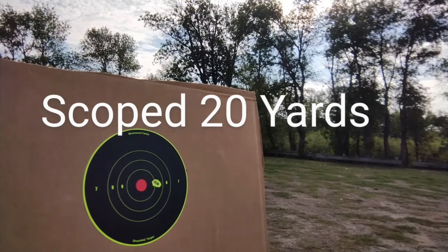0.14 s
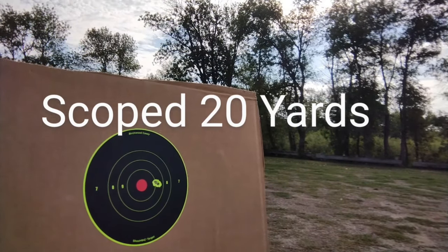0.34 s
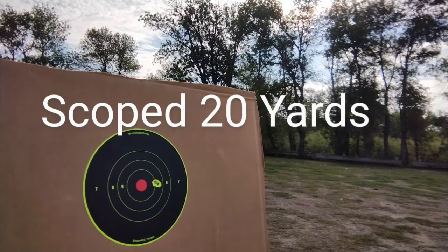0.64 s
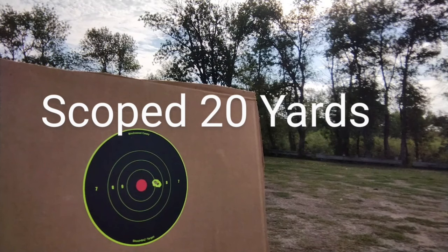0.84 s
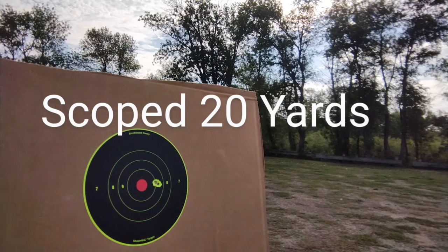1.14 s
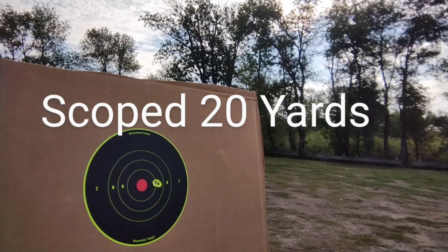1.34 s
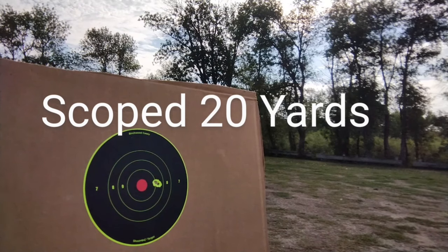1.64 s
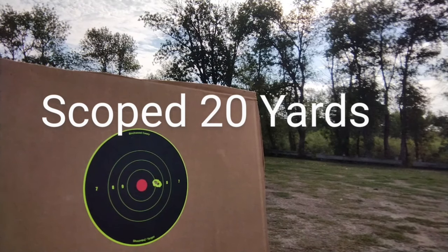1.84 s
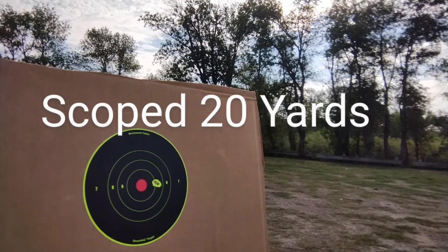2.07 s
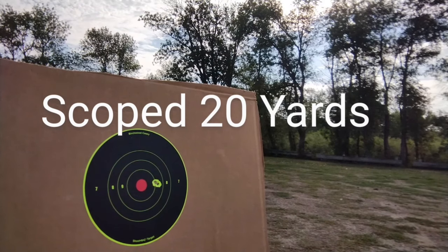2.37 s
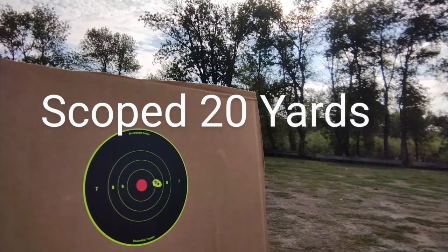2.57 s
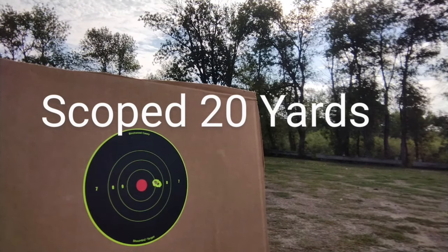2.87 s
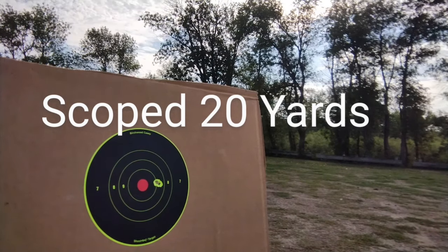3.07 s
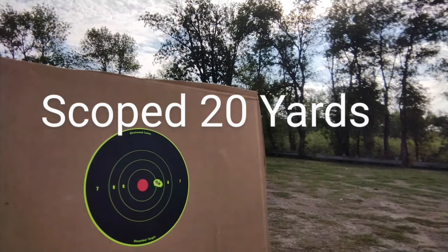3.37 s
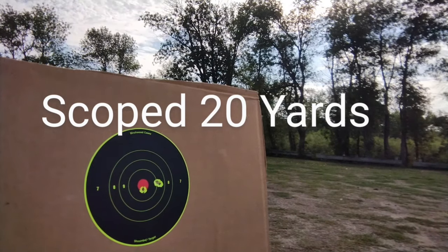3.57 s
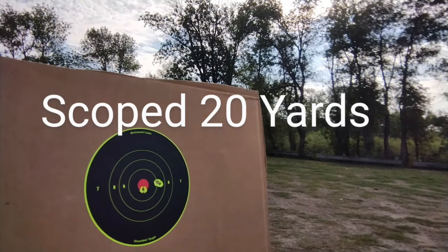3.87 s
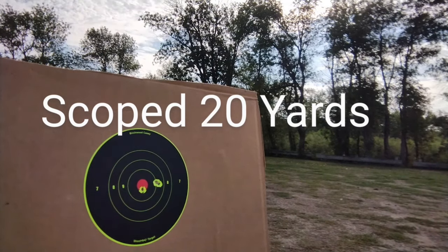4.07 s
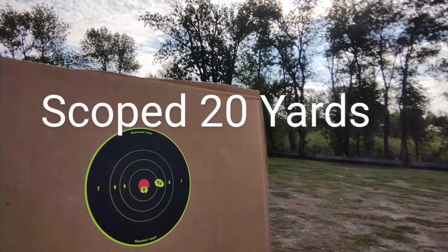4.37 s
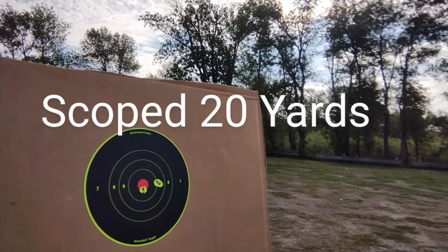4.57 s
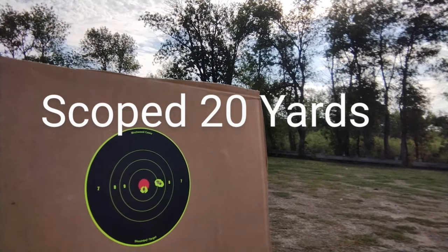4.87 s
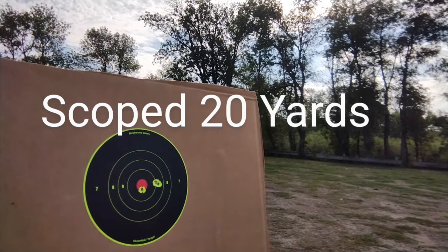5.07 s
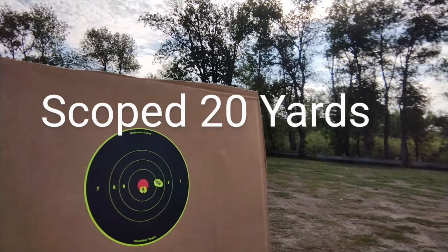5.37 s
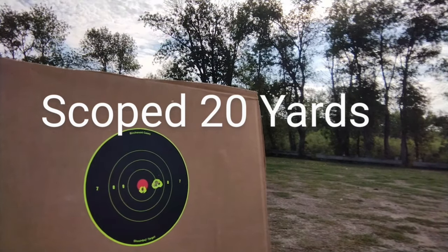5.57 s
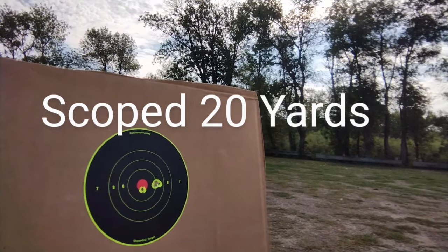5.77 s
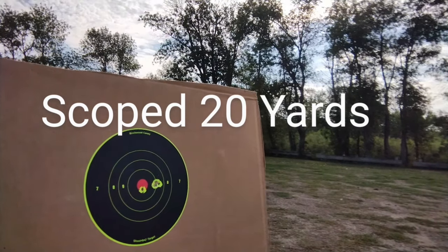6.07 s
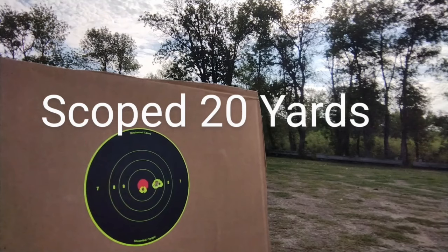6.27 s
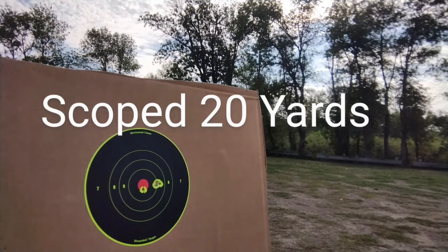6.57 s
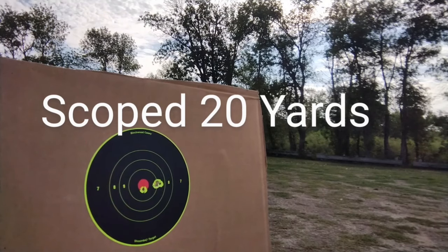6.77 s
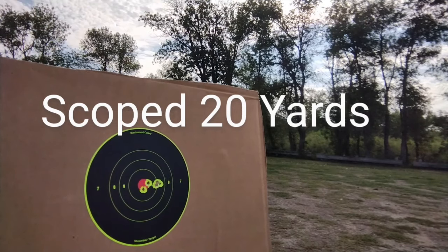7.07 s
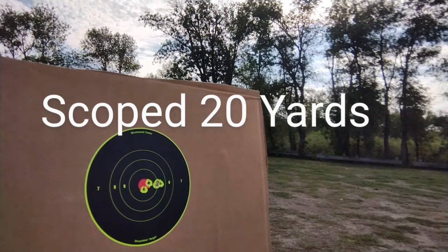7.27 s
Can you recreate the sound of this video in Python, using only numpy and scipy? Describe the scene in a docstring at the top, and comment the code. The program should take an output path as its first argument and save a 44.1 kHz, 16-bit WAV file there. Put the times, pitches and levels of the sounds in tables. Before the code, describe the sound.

A quiet yard with a pulsing cricket, faint insect chorus and distant chirps is broken at once by a hard, dry air rifle crack and card-tearing smack right at the microphone. A brief wash of echo scatters off trees, then calm for three seconds. Three more shots follow about two seconds or less apart, each with snap, hollow board thud and echo; light low wind buffets the microphone, mostly later.

```python
"""Yard, microphone beside a cardboard target: an air rifle fires four pellets, each a rasp and a ringing report,
then a whizz of rising noise and a slap of ripping noise and card modes. A grainy wash and single slaps
come back from trees and hard faces; after the first three shots the spent pellet patters down behind the card.
Throughout, a cricket trills in pulsed tones over an insect chorus of noise, with gliding bird whistles far off,
faint low tones, distant rumble and light wind in lumps of low noise on the microphone."""
import sys
import numpy as np
from scipy.fft import rfft, irfft
from scipy.io import wavfile
from scipy.ndimage import map_coordinates

SR = 44100
rng = np.random.default_rng(int(sys.argv[2]) if len(sys.argv) > 2 else 0)


def unload_audio(sound):
    """Save the sound as a 16-bit wav file, at the path given as the first command line argument."""
    columns = np.transpose(np.atleast_2d(sound))
    # keep every value between -1 and 1, then stretch to whole-number steps
    steps = np.round(np.clip(columns, -1, 1) * 32767)
    wavfile.write(sys.argv[1], SR, steps.astype(np.int16))


N = 327663
T = np.arange(N) / SR

# Spectra of noise all list: f/Hz, relative level/dB per Hz. Modes list: f/Hz, relative level/dB, t60/s.
# Muzzle reports: t/s, report level/dB, whizz level/dB, echo reference level/dB
SHOT_EVENTS = [(0.1724, -1.5, -29.5, -36.5), (3.5031, -6, -28, -35.5), (5.646, -5, -34, -37.5),
               (7.0928, -4, -30, -36.5)]
# Pellet strikes at the card: t/s, tear level/dB, air push level/dB, board level/dB, snap level/dB
STRIKES = [(0.1897, -10.5, -19.5, -25, -8.5), (3.521, -13.5, -27.5, -28.5, -9.5),
           (5.663, -14, -23, -26, -8), (7.1101, -8.5, -20.5, -21.5, -8)]
# Ringing modes of the barrel: f/Hz, relative level/dB, t60/s
BARREL_MODES = [(200, -14, 0.0036), (765, -10.5, .012), (1770, -13, 0.005), (2500, -1, 0.0081),
                (3350, -11, 0.011), (4480, -14, .012), (6220, -4.5, 0.0067), (7070, -7.5, 0.018)]
# Arrivals of one report at the microphone: delay t/s, relative level/dB
REPORT_ARRIVALS = [(0, -5), (.0009, 6.5), (.0026, -31.5), (.0035, -9.5)]
# Pellet in flight: f/Hz, relative level/dB per Hz
WHIZZ_SPECTRUM = [(350, -49.5), (600, -10), (1550, -12), (2360, 3), (3990, -4.5), (7120, 0.5), (7780, -9.5),
                  (8600, -37), (11200, -62), (18900, -120)]
# Torn card, also used for the rasp and the muzzle puff: f/Hz, relative level/dB per Hz
TEAR_SPECTRUM = [(240, -29.5), (400, -0.5), (558, -2), (1970, 1.5), (2610, -6.5), (3500, 0.5), (4760, -8),
                 (6480, -8.5), (7860, -18), (8600, -31.5), (11200, -64), (18900, -120)]
# First rip of the card: f/Hz, relative level/dB per Hz
RIP_SPECTRUM = [(500, -31.5), (1500, -12.5), (3000, -9.5), (4500, -9), (6500, 0.5), (7800, -4.5),
                (8700, -31)]
# Fast modes of the punched card: f/Hz, relative level/dB, t60/s
SNAP_MODES = [(1090, -8.5, 0.021), (2010, 0.5, 0.0097), (2590, -12, 0.0075), (3520, -1, 0.011),
              (4600, -14.5, 0.019)]
# Slow modes of the board: f/Hz, relative level/dB, t60/s
BOARD_MODES = [(280, -20.5, 0.49), (495.8, -14.5, 0.071), (604, -9.5, 0.14), (826, -5.5, 0.11),
               (1172, -3.5, 0.076), (1324, -4.5, .07)]
# Dull thud: f/Hz, relative level/dB per Hz
THUD_SPECTRUM = [(60, -30), (120, -5), (220, 1.5), (350, 0), (900, -7), (1500, -16.5), (2500, -35.5)]
# Spent pellet landing behind the card: t/s, level/dB, t60/s
PELLET_LANDINGS = [(.297, -42.5, 0.19), (3.6122, -40.5, 0.064), (5.776, -44, 0.045)]
# Echo wash, the same for every shot: t/s after the shot, relative leaves level/dB, relative trunks level/dB
TREE_ECHOES = [(.035, -7, -15), (.055, -14, -22), (.085, -8.5, -18), (.105, -12.5, -19.5),
               (.135, -1.5, -16.5), (.16, -1, -10), (.195, -4.5, -17), (.21, -10, -24.5), (.25, -10, -22.5),
               (.29, -24, -27.5), (.37, -24.5, -30.5), (.45, -33.5, -35.5), (.66, -45, -46)]
# Treble scattered by leaves: f/Hz, relative level/dB per Hz
LEAF_SPECTRUM = [(1940, -43.5), (3300, -16.5), (3900, -11), (5560, -3.5), (6800, -1), (7880, -9.5),
                 (8550, -26), (8800, -45), (11400, -65), (19400, -120)]
# Middle scattered by trunks: f/Hz, relative level/dB per Hz
TRUNK_SPECTRUM = [(180, -23.5), (300, -6), (700, -9), (1300, -3), (2400, -1.5), (3100, -4), (3900, -10),
                  (4500, -30.5)]
# Single echoes from hard faces: t/s after the shot, relative treble level/dB, middle level/dB above the treble
HARD_ECHOES = [(.079, -8.5, 0), (.086, -5, -18), (0.199, -1.5, -11), (0.232, -16, -14), (.256, -7, -12),
               (.37, -19, -12.5)]
# Late swell of treble: t/s, width/s, level/dB
TREBLE_SWELLS = [(3.821, 0.028, -46.5)]
# Cricket's course: t/s, beats ahead of a steady rate, level/dB before the hush
TRILL_COURSE = [(0, 0.25, -71.5), (1, -0.089, -73), (2.1, -.44, -72), (3.005, -.45, -71.5),
                (3.025, -0.39, -66), (4.6, 0.021, -64.5), (5.3, 0.25, -65.5), (5.32, .3, -71),
                (6.9, 1.3, -71.5), (6.97, 0.85, -73.5), (7.43, 1.17, -67.5)]
# Far bird whistles: t/s, length/s, start f/Hz, end f/Hz, level/dB
BIRD_PEEPS = [(.005, 0.078, 4800, 3720, -68), (0.632, .09, 8200, 5530, -66), (0.647, .05, 5500, 4800, -68),
              (0.776, 0.13, 3200, 4220, -65), (0.965, 0.044, 4730, 4560, -70),
              (2.452, 0.036, 2580, 4120, -68), (2.553, 0.058, 4100, 5400, -66),
              (2.715, 0.032, 4670, 4620, -65), (2.763, .04, 7700, 6200, -68), (2.766, .03, 4820, 4600, -65),
              (2.855, 0.0306, 4830, 3530, -73), (2.907, 0.04, 2730, 4400, -67),
              (2.992, 0.035, 4040, 4800, -66.5), (3.077, 0.038, 4650, 4660, -64.5),
              (3.125, 0.036, 4680, 4600, -68), (4.126, .03, 4690, 4580, -63)]
# Faint low tones: t/s, length/s, f/Hz, level/dB
LOW_TONES = [(0, 1.33, 287.1, -64), (1.096, 3.1, 290.4, -74), (3.019, 0.23, 229.3, -58)]
# Background course: t/s, air level/dB, chorus level/dB
YARD_LEVELS = [(0, -64.5, -67.5), (1.2, -67.5, -67.5), (3, -66, -67.5), (5.3, -66, -67.5),
               (7.43, -67, -68.5)]
# Distant rumble: f/Hz, relative level/dB per Hz
AIR_SPECTRUM = [(30, -22.5), (100, 1), (300, -8.5), (500, -9), (700, -15), (1500, -20.5), (3200, -27.5),
                (7000, -23), (8000, -36.5)]
# Insect chorus: f/Hz, relative level/dB per Hz
CHORUS_SPECTRUM = [(4000, -19), (4500, -1.5), (5000, -1), (5500, 2), (6000, -13), (7100, -6), (7900, -22.5),
                   (8600, -35)]
# Wind on the microphone: t/s, buffet level/dB
WIND_LEVELS = [(0, -73), (.5, -66), (.8, -75), (2.6, -88), (3.1, -69), (4.1, -66), (4.55, -65),
               (4.75, -50.5), (4.9, -56), (4.96, -63.5), (5.4, -65), (5.7, -54), (5.95, -64.5), (6.12, -58),
               (6.3, -70), (6.8, -62.5), (7.25, -53.5), (7.43, -64)]
# Single lumps of wind: t/s, level/dB
WIND_PUFFS = [(.085, -56), (.648, -55), (2.926, -60), (4.192, -66), (4.281, -49), (4.5, -63), (5.182, -57),
              (6.352, -49), (6.638, -57), (6.716, -56.5), (6.906, -53.5), (7.356, -60)]
# Wind noise at the microphone: f/Hz, relative level/dB per Hz
BUFFET_SPECTRUM = [(15, -46), (25, -24.5), (92, -0.5), (142, -10.5), (268, -28), (300, -25.5), (390, -53),
                   (660, -120)]

SLAP_T60_S, SLAP_SPREAD_DB = 0.015, 2
HUSH_DB, HUSH_S = -7.5, 0.19  # the trill sinks at each shot and comes back
TRILL_BEATS_PER_S = 53
SETTLE_PER_S, FADING_DB = 15, 3.5  # longer whistles bend more; distance makes them flicker
PUFF_S, LUMPY_DB = 0.012, 3
CLIP_LEVEL, LOW_CUT_HZ, TOP_HZ = 0.9, 21, 8950


def amp(db):
    """Turn dB into a linear factor."""
    return 10 ** (np.asarray(db) / 20)


def unit(x):
    """Scale to rms 1."""
    return x / np.sqrt(np.mean(x ** 2) + 1e-20)


def curves(rows, t=T):
    """One value per sample of t for each column after the time."""
    s, *columns = np.transpose(rows)
    return [np.interp(t, s, column) for column in columns]


def wobble(rate):
    """A smooth random curve, rate knots a second."""
    return map_coordinates(rng.standard_normal(int(N * rate / SR) + 4), [T * rate])


def noise(spectrum, grain_db=0, size=N):
    """Coloured noise of rms 1; grain_db spreads the size of its single samples."""
    white = rng.standard_normal(size) * amp(grain_db * rng.standard_normal(size))
    f, level_db = np.transpose(spectrum)
    hz = np.fft.rfftfreq(size, 1 / SR) + 1  # keeps the logarithm finite
    gain = amp(np.interp(np.log(hz), np.log(f), level_db, -120, -120))
    return unit(irfft(rfft(white) * gain, size))


def ring(modes, t, spread_db):
    """Damped sines started at t = 0, each at a new strength."""
    t = np.maximum(t, 0)
    out = 0
    for hz, db, t60 in modes:
        strength_db = db + spread_db * rng.standard_normal()
        out = out + amp(strength_db - 60 * t / t60) * np.sin(2 * np.pi * hz * t)
    return out


def add(track, s, sound):
    """Mix a sound in at s seconds."""
    part = track[round(s * SR):][:len(sound)]
    part += sound[:len(part)]


def rifle():
    """The spring releases with a faint rasp, the barrel rings in a bark, the pellet whizzes closer."""
    out, t = np.zeros(N), T[:4096]
    for s, db, whizz_db, _ in SHOT_EVENTS:
        bark = sum(amp(g) * ring(BARREL_MODES, t - late, 1.8) for late, g in REPORT_ARRIVALS)
        puff = amp(-6 - 60 * t / 0.024) * noise(TEAR_SPECTRUM, size=len(t))
        nearing = amp(whizz_db + 6 * t / 0.064) * (t < 0.02)
        whizz = nearing * noise(WHIZZ_SPECTRUM, size=len(t))
        add(out, s - 0.0006, amp(db - 9.5) * (bark + puff) + whizz)
        rasp = (t < 0.009) * noise(TEAR_SPECTRUM, size=len(t))
        add(out, s - 0.009, amp(db - 48) * rasp)
    return out


def target():
    """Air swells ahead of the pellet; the card rips, snaps, kicks back and thuds with a rough ring."""
    out, t = np.zeros(N), T[:16384]
    for s, db, push_db, board_db, snap_db in STRIKES:
        swell = np.exp(-((t - 0.0062) / 0.0024) ** 2)
        swell = swell + 0.4 * np.exp(-((t - 0.009) / 0.0015) ** 2)
        late = np.maximum(t - 0.0102, 0)
        kick = 2.6 * amp(-60 * late / 0.035) * np.sin(2 * np.pi * 125 * late)
        add(out, s - 0.01, amp(push_db) * (swell - kick))

        rise = 1 - np.exp(-t / 0.00073)
        rip = rise * noise(RIP_SPECTRUM, 2, size=len(t))
        add(out, s - 0.0003, amp(db - 60 * t / 0.022) * rip)

        # torn fibres crackle on in a fast and a slow decay
        shreds = rise * (amp(-60 * t / 0.028) + amp(-19 - 60 * t / 0.055))
        crackle = 0.73 * shreds * noise(TEAR_SPECTRUM, 3, size=len(t))
        snap = ring(SNAP_MODES, t - 0.0005, 1.5)
        add(out, s + 0.0009, amp(snap_db) * (snap + crackle))

        rattle = 1 + 0.5 * wobble(150)[:len(t)]  # loose card does not ring evenly
        thud = amp(-2 - 60 * t / 0.1) * noise(THUD_SPECTRUM, size=len(t))
        add(out, s + 0.0009, amp(board_db) * (rattle * ring(BOARD_MODES, t, 1.7) + thud))
    return out


def landings():
    """A sudden patter through leaves behind the card, with a dull thud under it."""
    out, t = np.zeros(N), T[:4096]
    for s, db, t60 in PELLET_LANDINGS:
        patter = noise(RIP_SPECTRUM, 2, size=len(t))
        patter = patter + amp(-11.5) * noise(TRUNK_SPECTRUM, 2, size=len(t))
        thud = amp(-7.5) * noise(THUD_SPECTRUM, size=len(t))
        add(out, s, amp(db - 60 * t / t60) * (patter + thud))
    return out


def echoes():
    """Foliage scatters the treble of each shot back in grains, trunks the middle; hard faces give single slaps."""
    out, t = np.zeros(N), T[:round(TREE_ECHOES[-1][0] * SR)]
    slap_t = T[:4096]
    leaf_db, trunk_db = curves(TREE_ECHOES, t)
    for s, _, _, db in SHOT_EVENTS:
        leaves = amp(leaf_db) * noise(LEAF_SPECTRUM, 3.5, size=len(t))
        trunks = amp(trunk_db) * noise(TRUNK_SPECTRUM, 3, size=len(t))
        add(out, s, amp(db) * (t > TREE_ECHOES[0][0]) * (leaves + trunks))
        for late, slap_db, middle_db in HARD_ECHOES:
            size_db = db + slap_db + SLAP_SPREAD_DB * rng.standard_normal()
            treble = noise(RIP_SPECTRUM, size=len(slap_t))
            middle = amp(middle_db) * noise(TRUNK_SPECTRUM, size=len(slap_t))
            add(out, s + late, amp(size_db - 60 * slap_t / SLAP_T60_S) * (treble + middle))
    for s, width, db in TREBLE_SWELLS:
        out += amp(db) * np.exp(-((T - s) / width) ** 2) * noise(LEAF_SPECTRUM, 3.5)
    return out


def cricket():
    """A wing stroke on every beat sounds one short tone that sinks a little."""
    ahead, db = curves(TRILL_COURSE)
    for s, *_ in SHOT_EVENTS:
        db = db + HUSH_DB * (T > s) * np.exp(-np.abs(T - s) / HUSH_S)
    beat = (TRILL_BEATS_PER_S * T + ahead + 0.5) % 1 - 0.5  # 0 at mid-stroke
    stroke = np.exp(-(beat / 0.15) ** 2) * amp(1.4 * wobble(40))
    hz = 3750 - 480 * beat + 12 * wobble(25)
    return amp(db) * unit(stroke * np.sin(2 * np.pi * np.cumsum(hz) / SR))


def birds():
    """Thin far whistles that glide fast at first, then settle."""
    out = np.zeros(N)
    for s, length, from_hz, to_hz, db in BIRD_PEEPS:
        u = T[:round(length * SR)] / length  # 0 to 1 through the whistle
        hz = to_hz + (from_hz - to_hz) * (1 - u) ** (1 + SETTLE_PER_S * length)
        flicker = amp(FADING_DB * wobble(95)[:len(u)])
        envelope = np.abs(np.sin(np.pi * u ** 0.91))
        tone = np.sin(2 * np.pi * np.cumsum(hz) / SR)
        add(out, s, amp(db) * envelope * flicker * tone)
    return out


def hums():
    """Low sines of wavering phase that start soon and fade out."""
    out, waver = np.zeros(N), wobble(17)
    for s, length, hz, db in LOW_TONES:
        u = T[:round(length * SR)] / length
        envelope = np.sqrt(np.minimum(u * 8, 1 - u))
        tone = np.sin(2 * np.pi * hz * u * length + 0.59 * waver[:len(u)])
        add(out, s, amp(db) * envelope * tone)
    return out


def yard():
    """Distant rumble, a shimmering insect chorus, and lumps of wind on the microphone, all as coloured noise."""
    air_db, chorus_db = curves(YARD_LEVELS)
    (wind_db,) = curves(WIND_LEVELS)
    air = amp(air_db + 0.8 * wobble(26)) * noise(AIR_SPECTRUM)
    shimmer_db = 0.75 * wobble(50) + 0.6 * wobble(36)
    chorus = amp(chorus_db + shimmer_db) * noise(CHORUS_SPECTRUM)
    puffs = sum(amp(db) * np.exp(-((T - s) / PUFF_S) ** 2) for s, db in WIND_PUFFS)
    wind = amp(wind_db) * unit(amp(LUMPY_DB * wobble(18))) + puffs
    buffet = unit(amp(1.4 * wobble(25)) * noise(BUFFET_SPECTRUM))
    return air + chorus + wind * buffet


def scene():
    """All sources at the one microphone, as a single channel."""
    shots = rifle() + target() + landings() + echoes()
    return (shots + cricket() + birds() + hums() + yard())[None]


def record(dry):
    """The microphone's chain rounds off peaks, thins deep bass, rolls off its top and stops at its band limit."""
    rounded = dry / (1 + np.abs(dry / CLIP_LEVEL) ** 4) ** 0.25
    hz = np.fft.rfftfreq(N, 1 / SR)
    bass = hz ** 2 / (hz ** 2 + LOW_CUT_HZ ** 2)
    top = amp(-36 * np.clip((hz - 8000) / 950, 0, 1)) * (hz < TOP_HZ)
    return irfft(rfft(rounded) * bass * top, N)


dry = scene()
out = record(dry)
unload_audio(out)
```